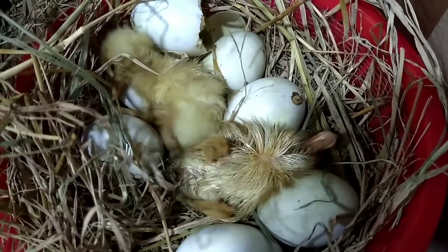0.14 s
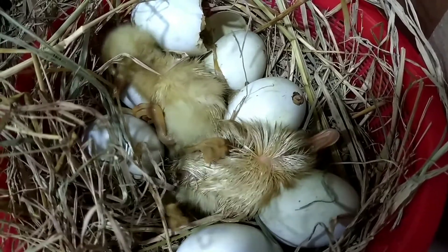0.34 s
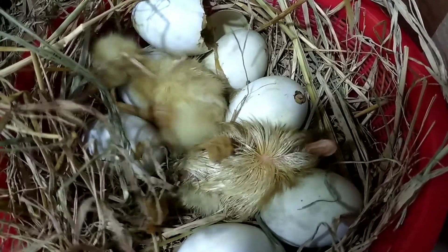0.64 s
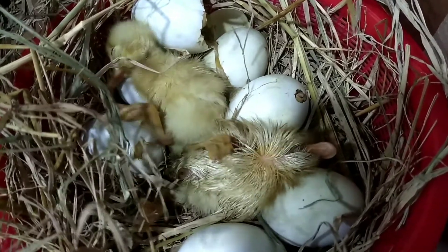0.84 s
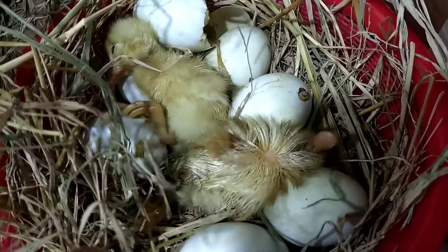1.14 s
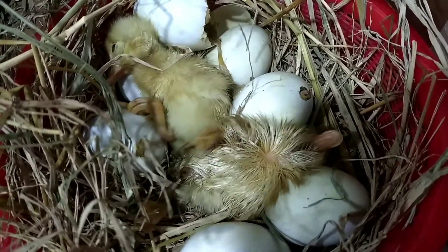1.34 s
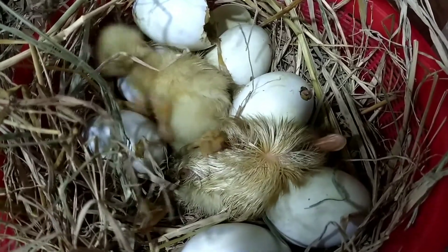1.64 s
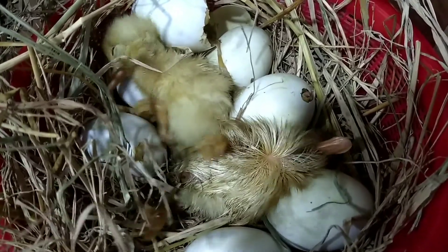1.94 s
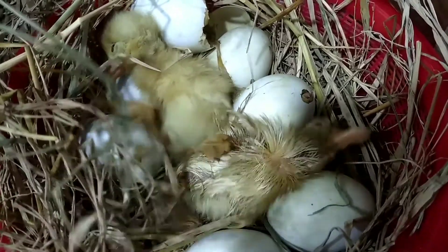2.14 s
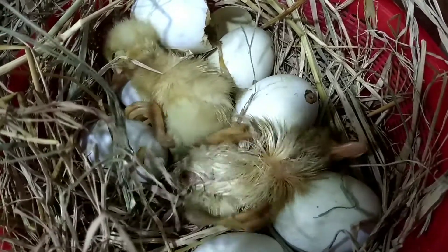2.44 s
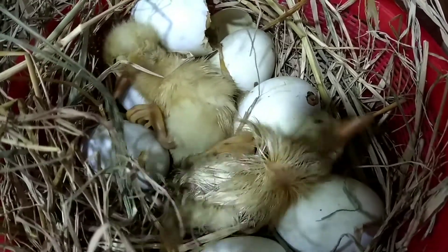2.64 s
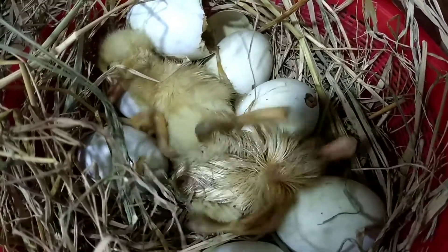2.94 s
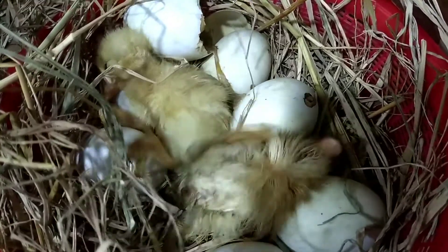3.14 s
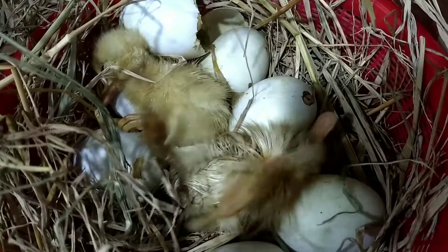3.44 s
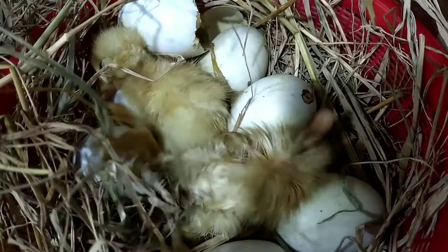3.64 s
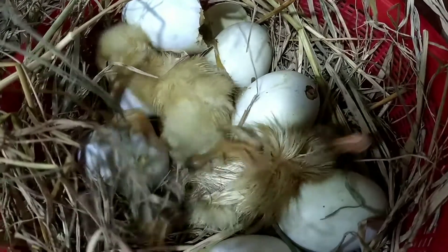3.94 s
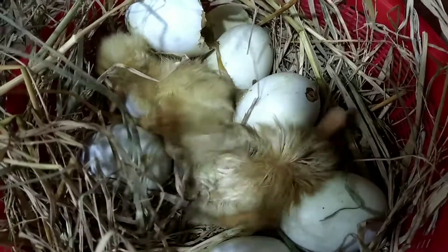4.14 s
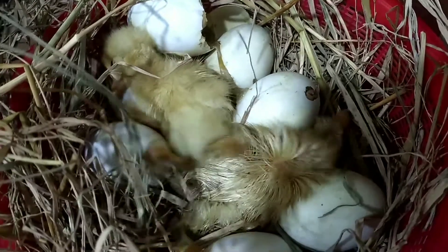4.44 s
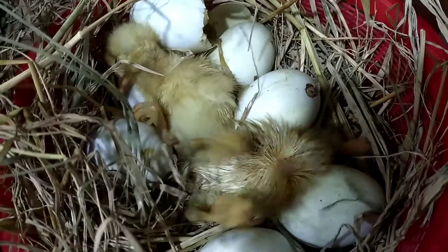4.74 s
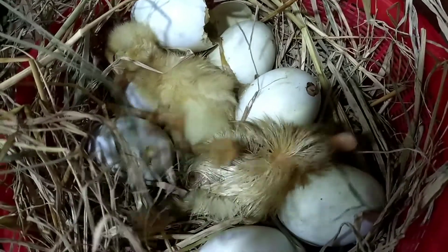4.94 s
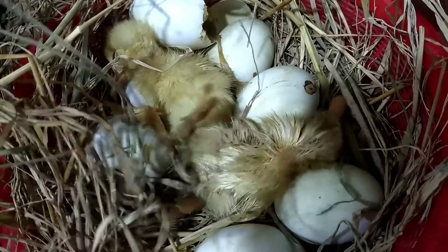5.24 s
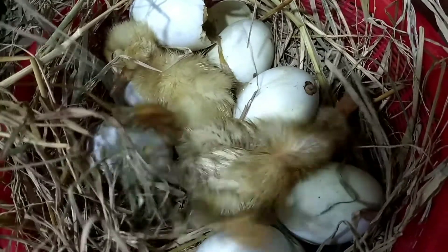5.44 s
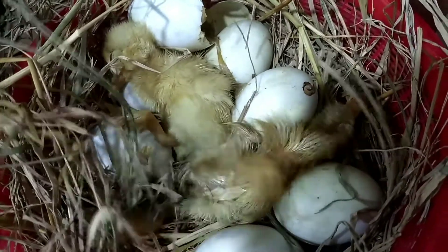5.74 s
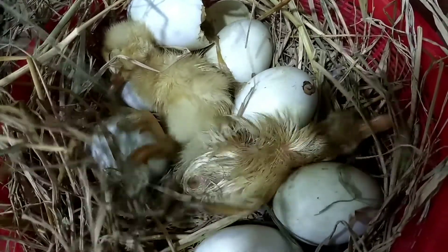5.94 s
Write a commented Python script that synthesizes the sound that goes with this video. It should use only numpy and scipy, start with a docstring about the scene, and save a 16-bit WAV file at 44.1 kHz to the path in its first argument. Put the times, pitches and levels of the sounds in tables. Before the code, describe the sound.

Newly hatched ducklings give three high, raspy peeps, then a cleaner lower pair and stray peeps, over soft straw rustling and a faint indoor hum.

```python
"""Three high, raspy peeps come first, then a clean lower pair and a few stray peeps: newly hatched
ducklings in a straw-lined plastic tub, indoors. Each peep is a whistle of the syrinx that arches in
pitch and rasps when strained membranes flutter. The tub and the room echo the peeps. Straw rustles
and the tub thuds softly as the birds shift about, over faint room noise and a low hum."""
import sys
import numpy as np
from scipy import signal
from scipy.fft import rfft, irfft
from scipy.io import wavfile
from scipy.ndimage import uniform_filter1d, map_coordinates

SR = 44100
rng = np.random.default_rng(int(sys.argv[2]) if len(sys.argv) > 2 else 0)


def generate_wav(signal):
    """Clip the signal to [-1, 1] and save it as 16-bit WAV at the path in sys.argv[1]."""
    frames = np.transpose(np.atleast_2d(signal))
    scaled = np.clip(frames, -1, 1) * 32767
    pcm = np.round(scaled).astype(np.int16)
    wavfile.write(sys.argv[1], SR, pcm)


N = 269010
TIME = np.arange(N) / SR

# Spectrum of the room noise: frequency_hz, relative_density_db
AIR_SPECTRUM = [(25, -39), (50, -20), (87, -7.5), (120, -8.5), (165, -2.5), (230, -16), (350, -14.5),
                (600, -14.5), (900, -11), (1500, -16.5), (2500, -13.5), (3600, -21), (6500, -26),
                (14000, -34)]
# Stereo balance of the background: frequency_hz, left_over_right_db
BACKGROUND_BALANCE = [(110, 12), (200, 16), (380, 11), (690, -1.5), (2400, 6), (5000, -4)]
# Likeness of the room noise at the two ears: frequency_hz, coherence (0-1)
AIR_COHERENCE = [(130, 0.92), (290, .5), (640, 0.29), (1400, 0)]
# Narrow bands of the hum: centre_hz, half_width_hz, level_db
HUM_BANDS = [(94.3, 2.9, -69), (158, 20, -79.5), (182.6, 10, -71), (307, 9.5, -77.5), (502.7, 9, -76),
             (739, 5.5, -75), (908, 47, -74)]
# Bodies bumping the tub: centre_s, level_db, half_width_s, pitch_hz
BODY_BUMPS = [(3.5, -70, 0.13, 140), (4.0, -62, 0.049, 324), (4.107, -63.5, 0.038, 620),
              (4.292, -64, 0.032, 156), (5.441, -62, 0.012, 520)]
# Spectrum of rubbed straw: frequency_hz, relative_density_db
STRAW_SPECTRUM = [(400, -9), (1500, -6), (2800, -1.5), (4200, 0), (5100, -4.5), (6400, -3), (7400, 3),
                  (9200, 5), (11200, -2.5), (14000, -3)]
# Birds shifting in the straw: start_s, length_s, base_level_db
BIRD_MOVES = [(.02, 0.1, -61), (0.54, 0.04, -57.5), (0.684, 0.092, -48), (1.459, 0.0089, -60.5),
              (1.582, 0.058, -58), (1.614, 0.16, -59.5), (2.102, 0.29, -61), (2.181, 0.064, -54),
              (2.58, .03, -62.5), (2.739, .04, -53), (2.788, 0.13, -63), (3.171, 0.19, -55.5),
              (3.634, 0.58, -60.5), (3.747, 0.017, -53.5), (3.844, 0.079, -53.5), (4.026, 0.12, -55.5),
              (4.25, 0.43, -62), (4.42, 0.018, -57), (4.825, 0.05, -57.5), (4.937, 0.07, -57.5),
              (5.026, 0.22, -60), (5.267, 0.17, -51), (5.447, .12, -59.5), (5.658, 0.14, -59.5),
              (5.8, 0.59, -57), (5.941, 0.047, -48.5)]
# Single stalks slipping or snapping: peak_s, level_db, rise_s, decay_s
STALK_SLIPS = [(.74, -50, 0.0073, 0.012), (.92, -61.5, 0.0021, .006), (1.565, -50, 0.0066, .012),
               (1.663, -44.5, 0.006, 0.0069), (1.744, -40, .0005, 0.0065), (2.228, -43.5, .002, .008),
               (3.192, -45, .0007, 0.01), (3.418, -45.5, 0.0056, 0.011), (3.67, -44.5, 0.015, 0.0097),
               (4.13, -43, 0.0058, 0.0075), (4.487, -50, 0.004, 0.0051), (4.51, -45, .0007, 0.0045),
               (4.563, -44, 0.0032, 0.016), (4.959, -45.5, .002, .005), (5.072, -46, .002, .005),
               (5.332, -44, .002, 0.011), (5.403, -37.5, 0.0024, 0.017), (5.417, -44, 0.005, 0.0068)]
# Early echoes and late tail of the room: level_db, t60_s
ROOM_DECAYS = [(-15, .16), (-21.5, .4)]
# Reflections off the tub and eggs: left_delay_ms, right_delay_ms, gain_db
TUB_REFLECTIONS = [(1.3, 2.6, -18.5), (2.9, 3.1, -12.5), (5.3, 6.7, -12), (9.4, 8.2, -8.5)]
# Response of throat and bill, which colours overtones and hiss: frequency_hz, gain_db
VOCAL_TRACT = [(900, -13.5), (1450, -4.5), (2300, -7), (3400, -7), (4400, 11), (5100, -8.5), (5600, 0),
               (6900, -2), (7600, -5), (8500, 2.5), (9800, 4), (11000, -19), (12800, -5), (14200, -11.5)]
# Near a strained crest the whistle locks, briefly loud, clear and a little flat:
# centre_s, half_width_s, gain_db, pitch_drop_hz
WHISTLE_LOCKS = [(0.13, 0.0044, 2, 2), (0.18, 0.0065, 10, 136), (.631, .004, 7, 0),
                 (0.644, .005, 9.5, 221.5), (1.108, 0.0057, 9, 44), (1.143, 0.0043, 10.5, 130.5),
                 (1.155, 0.0035, 11, 6)]
# One arch per peep: start_s, rise_s, fall_s, start_hz, crest_hz, end_hz, crest_db, start_re_crest_db,
# end_re_crest_db, rise_rasp (0-1), fall_rasp (0-1), second_harmonic_db, third_harmonic_db,
# subharmonic_db (these three before the vocal tract), left_over_right_db, right_lag_ms
PEEP_ARCHES = [(0.096, 0.061, 0.074, 3257, 4303, 3210, -30.5, -12.5, -10, 1, 1, -9.5, -15, -19.5, 0.1, 0.049),
               (0.582, .060, .057, 3300, 4340, 3410, -29.5, -14.5, -10, 0.85, 1, -9, -14.5, -18.5, 1, 0.049),
               (1.059, 0.067, .070, 3150, 4424, 3167, -32, -11.5, -9.5, 0.74, 1, -10.5, -15, -16, -2, 0.043),
               (2.798, 0.041, 0.043, 2010, 2884, 1924, -32, -4.5, -9.5, 0.18, 0.16, -21, -33, -38, 2, -0.034),
               (3.035, 0.031, 0.034, 2155, 3472, 2180, -21, -17, -13, .1, .04, -18, -30.5, -47, 2.5, -0.033),
               (4.271, .048, 0.0253, 1634, 3490, 2540, -30.5, -22.5, -21, 0.36, 0.7, -18, -26, -11, 1.5, -0.033),
               (4.986, 0.02, 0.027, 2280, 2570, 2250, -63, -4, -8, .7, 0.77, -29.5, -30, -30, 6, 0.036),
               (5.432, 0.017, 0.035, 2215, 2450, 2050, -53, -8, -1, 0.4, .45, -30, -30, -30, -2, 0.089)]

EAR_SIGNS = np.array([[1], [-1]])   # left, right
ARCH_POWER = 2.4   # of pitch and level; above 2: a flat top with steep flanks
BREAK_AT, BREAK_WIDTH = 0.57, 0.17   # where the voice breaks, as shares of a flank from the crest
RASP_FLOOR, LOCK_CLEARS = 0.35, 0.82   # shares of rasp left away from a break and removed by a lock
WAVER_HZ, JITTER_HZ = 170, 340   # slow and fast pitch spread at full rasp
WAVER_RATE_HZ, JITTER_RATE_HZ = 160, 750
FLUTTER_HZ, FLUTTER_DEPTH, CATCH_DB = 700, 0.55, 4.5   # chop rate; chop and level swing at full rasp


def from_db(db):
    """Amplitude grows tenfold for every 20 dB."""
    return 10 ** (np.asarray(db) / 20)


def unit_rms(x):
    """Dividing by the root mean square gives unit power."""
    return x / np.sqrt(np.mean(x ** 2) + 1e-20)


def at_hz(points, hz):
    """Interpolation on a logarithmic frequency axis."""
    knots, values = np.transpose(points)
    return np.interp(np.log(hz + 1e-9), np.log(knots), values)


def butter(x, hz, kind):
    """A causal Butterworth filter has a maximally flat passband."""
    return signal.sosfilt(signal.butter(2, hz, kind, fs=SR, output="sos"), x + 1e-18)


def tinted(x, spectrum):
    """Linear filtering multiplies the spectrum by a gain curve."""
    size = x.shape[-1]
    return irfft(rfft(x) * from_db(at_hz(spectrum, np.fft.rfftfreq(size, 1 / SR))), size)


def coloured_noise(spectrum):
    """Filtering white noise gives two independent channels of one colour, at unit power."""
    return unit_rms(tinted(rng.standard_normal((2, N)), spectrum))


def wander(rate_hz, size):
    """Low-passed noise fluctuates up to a given rate, with unit spread."""
    run_in = SR // 4
    return unit_rms(butter(rng.standard_normal(size + run_in), rate_hz, "low")[run_in:])


def background(air_db=-63):
    """Partly coherent room noise, its bass to the left, with a hum that wavers as narrowband noise does."""
    hz = np.fft.rfftfreq(N, 1 / SR)
    mid, side = rfft(from_db(air_db) * coloured_noise(AIR_SPECTRUM))
    for centre_hz, half_width_hz, level_db in HUM_BANDS:
        band = irfft(rfft(rng.standard_normal(N)) / (1 + ((hz - centre_hz) / half_width_hz) ** 2), N)
        mid = mid + rfft(from_db(level_db) * unit_rms(band)) / np.sqrt(2)
    coherence = np.clip(at_hz(AIR_COHERENCE, hz), -1, 1)
    ears = np.sqrt(1 + coherence) * mid + EAR_SIGNS * np.sqrt(1 - coherence) * side
    pan = from_db(EAR_SIGNS * at_hz(BACKGROUND_BALANCE, hz) / 2)
    return irfft(ears * pan / pan.mean(axis=0), N)


def bumps(band_ratio=1.2, pan_db=3):
    """A soft body excites a low band of the tub's vibration: a dull thud."""
    out = 0
    for centre_s, level_db, half_width_s, hz in BODY_BUMPS:
        thud = unit_rms(butter(rng.standard_normal(N), [hz / band_ratio, hz * band_ratio], "band"))
        out = out + from_db(level_db) * np.exp(-((TIME - centre_s) / half_width_s) ** 2 / 2) * thud
    return out * from_db(EAR_SIGNS * pan_db / 2)


def shuffle_power(rest_db=-69.5, attack_s=0.013, release_s=0.017):
    """Incoherent sources add in power: each move swells, holds and dies away."""
    power = from_db(rest_db) ** 2   # the nest is never quite still
    for start_s, length_s, level_db in BIRD_MOVES:
        outside = np.maximum((start_s - TIME) / attack_s, (TIME - start_s - length_s) / release_s)
        power = power + (from_db(level_db) * np.exp(-np.clip(outside, 0, 20))) ** 2
    return power


def straw(rustle_gain_db=1.5, grain_db=0.94, grain_hz=250, ticks_per_s=30, tick_db=5.0, tick_s=0.0021):
    """Friction of down and feet on straw makes fine grains and ticks; now and then a stalk slips."""
    impulses = (rng.random(N) < ticks_per_s / SR) * rng.exponential(1, N)
    ticks = signal.lfilter([from_db(tick_db) ** 2], [1, -np.exp(-1 / (tick_s * SR))], impulses + 1e-18)
    power = shuffle_power() * from_db(rustle_gain_db) ** 2 * (1 + ticks)
    for peak_s, level_db, rise_s, decay_s in STALK_SLIPS:
        age = TIME - peak_s
        power = power + (from_db(level_db) * np.exp(-np.maximum(-age / rise_s, age / decay_s))) ** 2
    grains = unit_rms(from_db(grain_db * wander(grain_hz, N)))
    return np.sqrt(power) * grains * coloured_noise(STRAW_SPECTRUM)


def room(x, wall_cutoff_hz=11000, gap_s=0.012):
    """Reverberation: dense echoes decay exponentially, and the walls absorb their treble."""
    t = TIME[:SR * 3 // 5]
    onset = np.clip(t / gap_s - 1, 0, 1)
    response = 0
    for level_db, t60_s in ROOM_DECAYS:
        echoes = rng.standard_normal((2, len(t))) * onset * np.exp(-np.log(1000) * t / t60_s)
        response = response + from_db(level_db) * unit_rms(echoes) / np.sqrt(len(t))
    return butter(signal.fftconvolve(x, response, axes=1)[:, :N], wall_cutoff_hz, "low")


def tub(x):
    """Interference: close reflections beat against the gliding whistle."""
    out = x.copy()
    for left_ms, right_ms, gain_db in TUB_REFLECTIONS:
        for side, delay_ms in enumerate((left_ms, right_ms)):
            out[side] += from_db(gain_db) * np.interp(TIME - delay_ms / 1000, TIME, x[side])
    return out


def arch(start_s, rise_s, fall_s, start_hz, crest_hz, end_hz, crest_db, start_db, end_db,
         rise_rasp, fall_rasp):
    """Pitch and level rise and fall together; the oscillation breaks on the flanks and clears in locks."""
    t = TIME[int(start_s * SR):int((start_s + rise_s + fall_s) * SR)]
    since_crest = t - start_s - rise_s
    rising = since_crest < 0
    flank = np.abs(since_crest) / np.where(rising, rise_s, fall_s)
    pitch_hz = crest_hz + (np.where(rising, start_hz, end_hz) - crest_hz) * flank ** ARCH_POWER
    level_db = crest_db + np.where(rising, start_db, end_db) * flank ** ARCH_POWER
    breaking = np.exp(-((flank - BREAK_AT) / BREAK_WIDTH) ** 2 / 2)
    rasp = np.where(rising, rise_rasp, fall_rasp) * (RASP_FLOOR + (1 - RASP_FLOOR) * breaking)
    for centre_s, half_width_s, gain_db, drop_hz in WHISTLE_LOCKS:
        lock = np.exp(-((t - centre_s) / half_width_s) ** 2 / 2)
        pitch_hz -= drop_hz * lock
        level_db += gain_db * lock
        rasp *= 1 - LOCK_CLEARS * lock
    return t, pitch_hz, level_db, np.clip(rasp, 0, 1)


def peep(contour, second_db, third_db, subharmonic_db, hiss_db=-8, attack_s=0.0027, release_s=0.0071):
    """The syrinx whistles; under strain its membranes flutter, modulating pitch and level into a rasp."""
    t, pitch_hz, level_db, rasp = arch(*contour)
    size = len(t)
    # the pitch wavers under mild strain and breaks up under strong strain
    waver = rasp * WAVER_HZ * wander(WAVER_RATE_HZ, size)
    jitter = rasp ** 2 * JITTER_HZ * wander(JITTER_RATE_HZ, size)
    phase = 2 * np.pi * np.cumsum(uniform_filter1d(pitch_hz, size=150) + waver + jitter) / SR
    overtones = from_db(second_db) * np.sin(2 * phase) + from_db(third_db) * np.sin(3 * phase)
    # period doubling: unequal alternate cycles add lines halfway between the harmonics
    halves = sum(np.sin((k + 0.5) * phase) for k in range(3))
    overtones += from_db(subharmonic_db) * rasp * halves * wander(JITTER_RATE_HZ / 2, size)
    # overtones grow faster than the fundamental as the bird pushes harder
    brightness = from_db(0.053 * (level_db - level_db.max()))
    tone = np.sin(phase) + tinted(overtones * brightness, VOCAL_TRACT)
    # a slower, uneven vibration chops the whistle into reedy sidebands
    chop_hz = FLUTTER_HZ * (1 + 0.294 * wander(WAVER_RATE_HZ, size))
    chop = np.sqrt(2) * np.sin(2 * np.pi * np.cumsum(chop_hz) / SR)
    depth = FLUTTER_DEPTH * rasp ** 2
    tone *= (1 + depth * chop) / np.sqrt(1 + depth ** 2)
    # the strained whistle catches and recovers several times within a peep
    tone *= from_db(CATCH_DB * np.sqrt(rasp) * (np.tanh(wander(WAVER_RATE_HZ, size)) - rasp / 2))
    hiss = unit_rms(tinted(rng.standard_normal(size), VOCAL_TRACT))
    gate = np.clip(np.minimum((t - t[0]) / attack_s, (t[-1] - t) / release_s), 0, 1)
    voice = gate * from_db(level_db) * (np.sqrt(2) * tone + from_db(hiss_db) * rasp * hiss)
    return np.interp(TIME, t, voice, left=0, right=0)


def ducklings():
    """Directional cues: each peep reaches the ears at a level and delay set by where the bill points."""
    out = np.zeros((2, N))
    for *contour, second_db, third_db, subharmonic_db, pan_db, lag_ms in PEEP_ARCHES:
        voice = peep(contour, second_db, third_db, subharmonic_db)
        delayed = map_coordinates(voice, [np.arange(N) - lag_ms * SR / 1000], order=3)
        out[0] += from_db(pan_db / 2) * voice
        out[1] += from_db(-pan_db / 2) * delayed
    return out


def scene():
    """Superposition: the peeps and their echoes add to straw, bumps and background."""
    peeps = tub(ducklings())
    return peeps + room(peeps) + straw() + bumps() + background()


def record(dry, cutoff_hz=14400):
    """An elliptic low-pass filter cuts the highest treble steeply."""
    return signal.sosfilt(signal.ellip(10, 0.2, 70, cutoff_hz, fs=SR, output="sos"), dry)


dry = scene()
out = record(dry)
generate_wav(out)
```